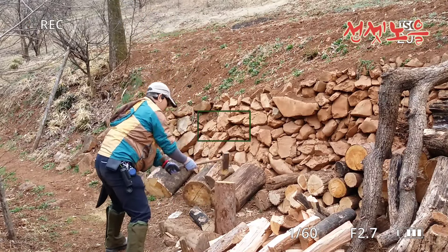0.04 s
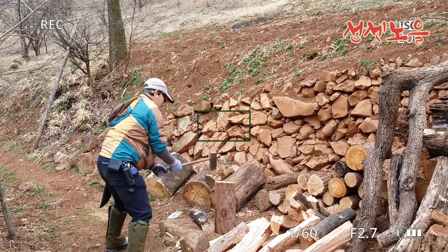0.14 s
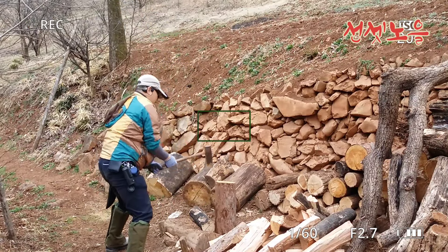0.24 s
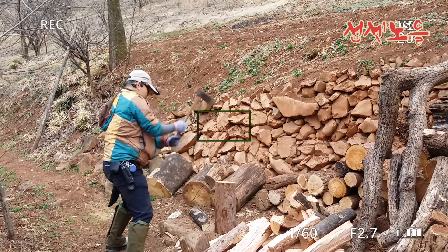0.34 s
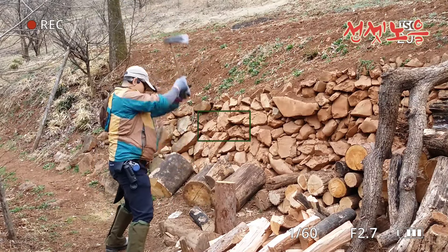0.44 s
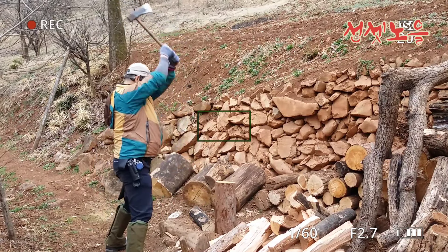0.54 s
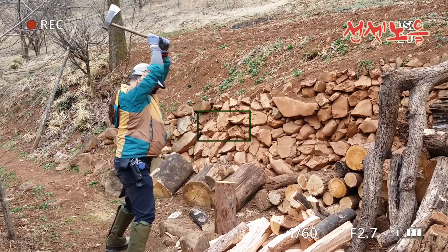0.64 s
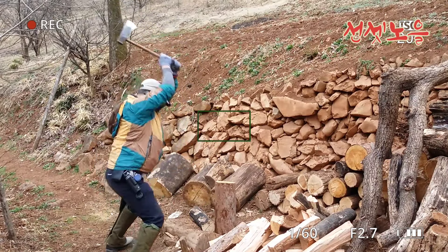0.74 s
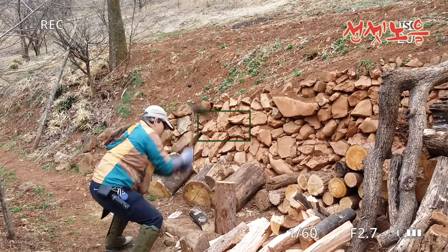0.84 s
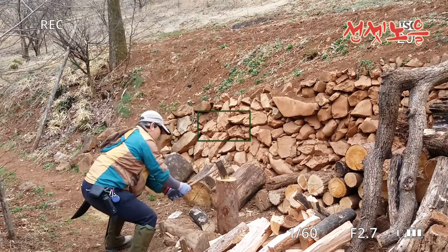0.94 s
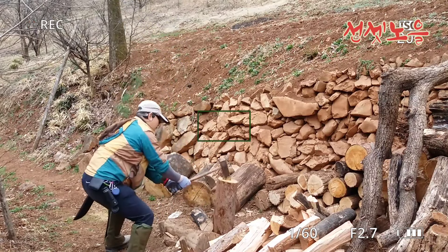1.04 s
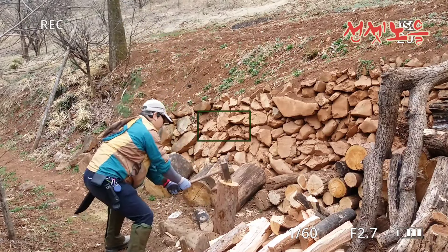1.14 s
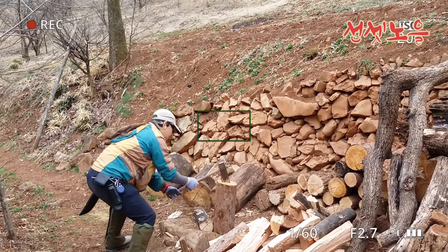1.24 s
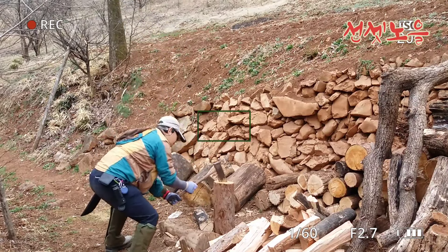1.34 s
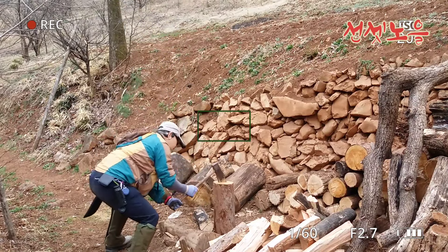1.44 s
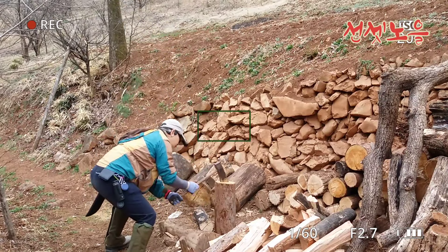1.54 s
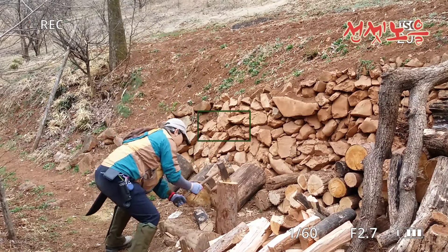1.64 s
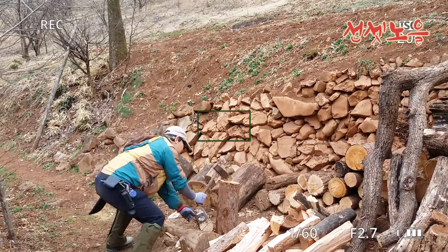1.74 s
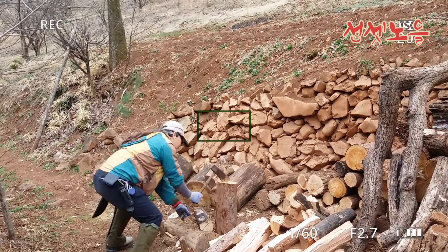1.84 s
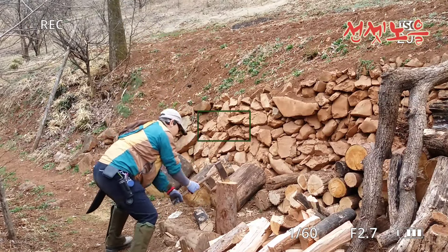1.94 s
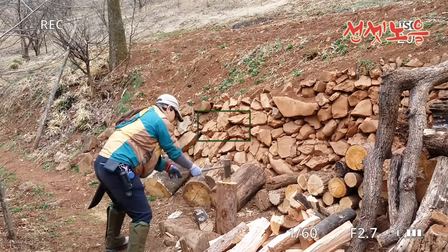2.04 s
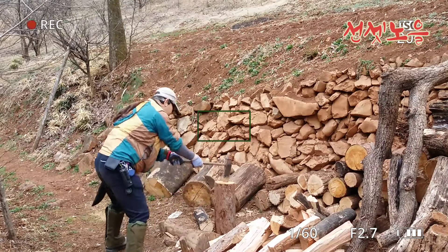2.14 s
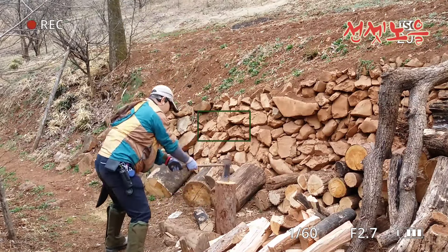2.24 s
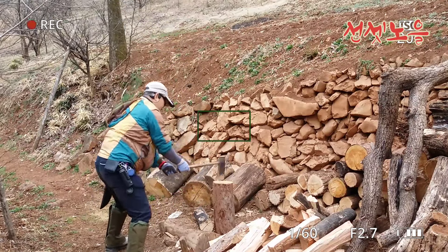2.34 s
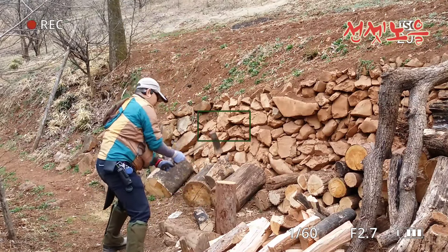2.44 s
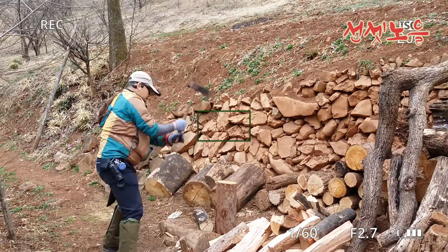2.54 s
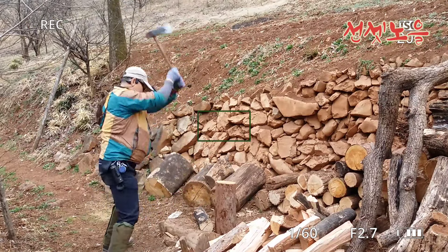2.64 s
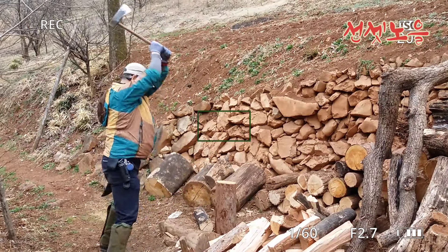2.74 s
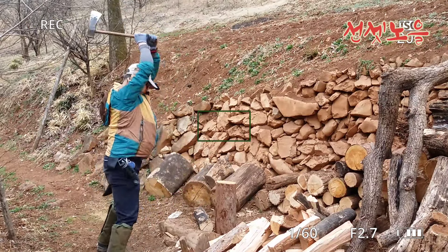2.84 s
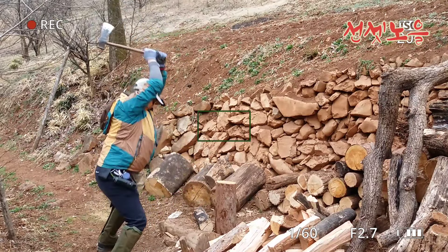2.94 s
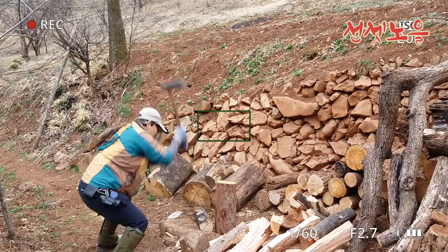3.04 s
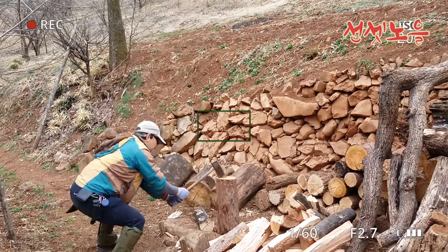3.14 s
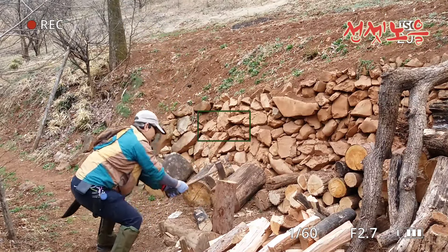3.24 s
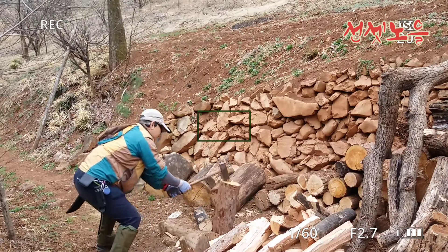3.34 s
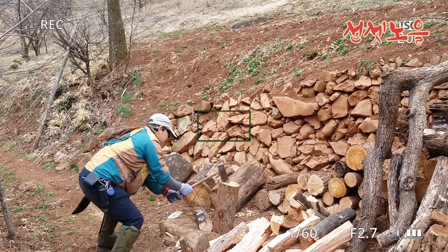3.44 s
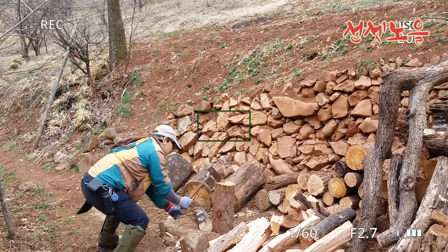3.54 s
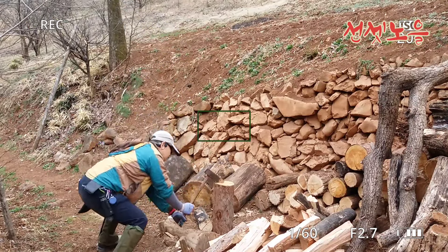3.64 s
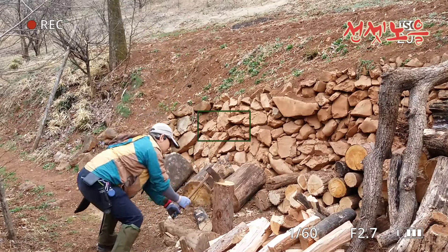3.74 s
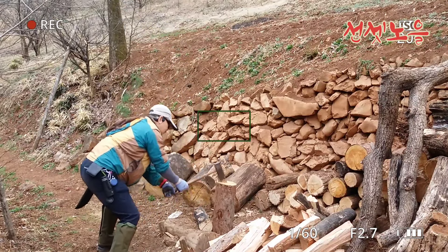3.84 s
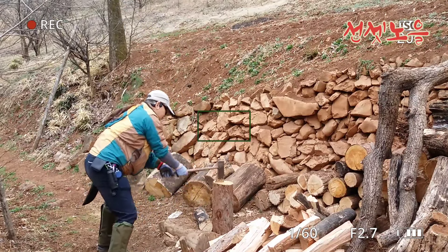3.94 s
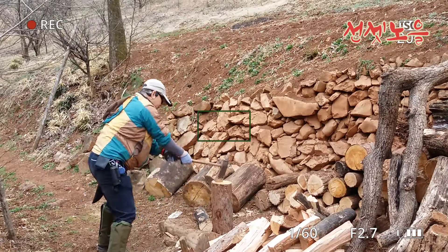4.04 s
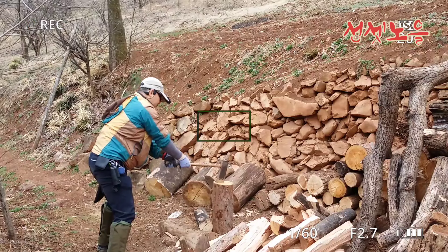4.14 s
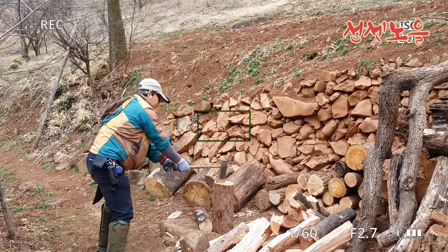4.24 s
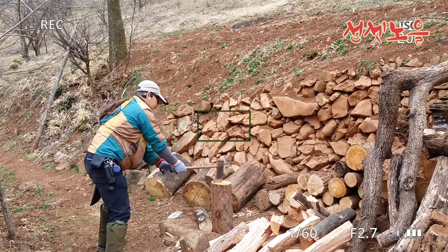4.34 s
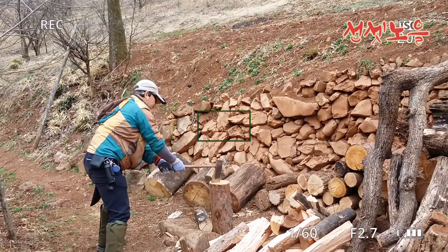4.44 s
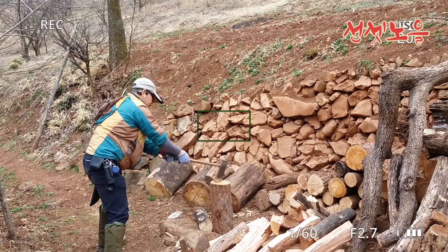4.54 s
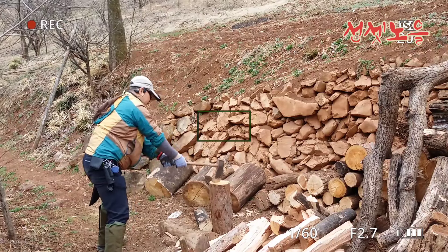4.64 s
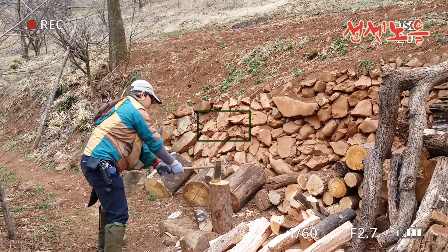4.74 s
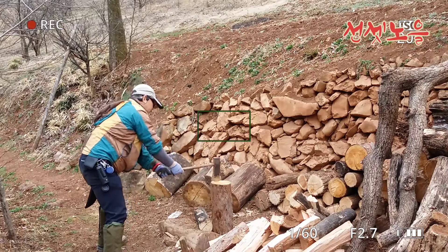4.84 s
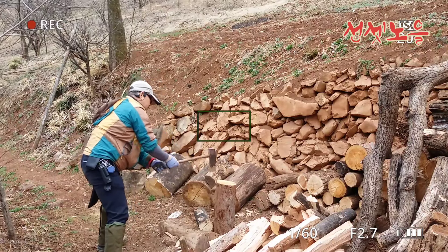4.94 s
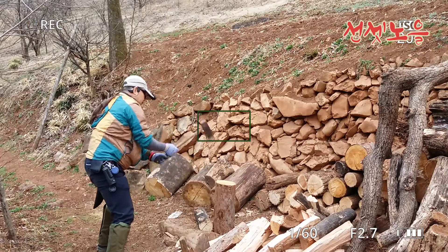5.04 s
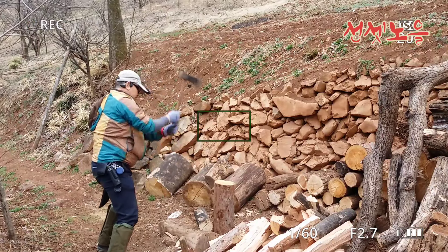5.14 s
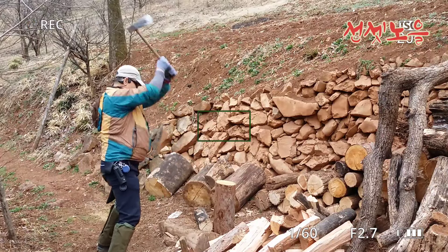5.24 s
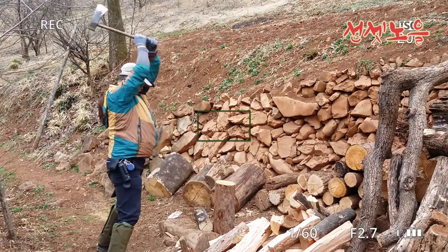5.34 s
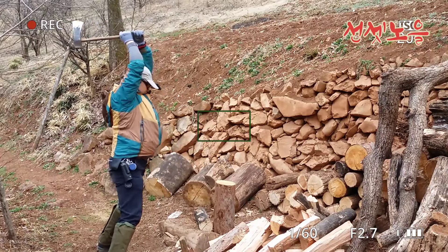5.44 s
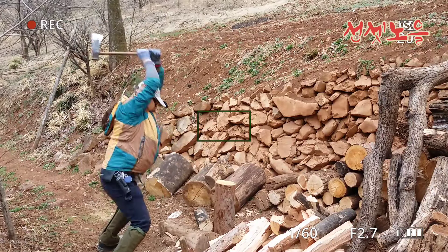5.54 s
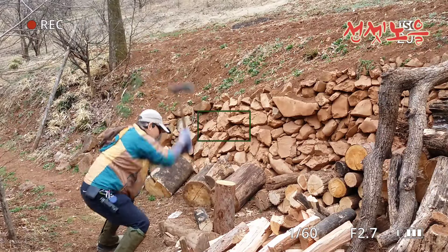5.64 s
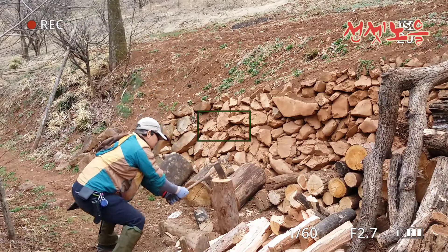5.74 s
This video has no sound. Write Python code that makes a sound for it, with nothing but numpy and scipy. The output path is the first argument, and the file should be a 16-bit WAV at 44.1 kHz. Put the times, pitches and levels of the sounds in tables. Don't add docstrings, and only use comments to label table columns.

```python
import sys
import numpy as np
from scipy import signal
from scipy.fft import rfft, irfft, next_fast_len
from scipy.io import wavfile
from scipy.ndimage import map_coordinates

SR = 44100
rng = np.random.default_rng(int(sys.argv[2]) if len(sys.argv) > 2 else 0)


def waveform_to_disk(signal):
    frames = np.transpose(np.atleast_2d(signal))
    scaled = np.clip(frames, -1, 1) * 32767
    samples = np.round(scaled).astype(np.int16)
    wavfile.write(sys.argv[1], SR, samples)


def decibels_to_gain(level_db):
    exponent = np.asarray(level_db, float) / 20
    return 10 ** exponent


N = 255780

# frequency in Hz, level in dB per Hz.
VALLEY = [(20, -0.5), (45, -3.5), (100, 0), (220, 1), (350, -3), (700, -14.5), (1500, -23.5), (4000, -48.5)]
# frequency in Hz, level in dB per Hz.
BUFFET = [(20, -9), (50, 1), (90, 1.5), (160, -5), (300, -22), (800, -61.5)]
# time in seconds, level in dB, left over right in dB.
GUSTS = [(0.0, -56.5, 5), (0.26, -70, 1.2), (0.335, -51, -16), (0.43, -54, 16), (0.51, -45, 15),
         (0.67, -58, -7), (0.89, -64, 5), (1.3, -74, -5), (1.76, -73, -1.3), (1.84, -64, -12),
         (2.1, -73, -1.2), (2.6, -78, -4), (2.93, -72, -1.5), (3.1, -77, 1.2), (3.57, -74, 3),
         (3.69, -63, -3), (4.42, -82, 0.35), (5.7, -70, -1.24)]
# time in seconds, peak in dB, pitch in Hz, left over right in dB.
PUFFS = [(0.331, -30.5, 83.4, -23), (0.383, -42, 40.4, 20), (0.436, -40, 92, 25), (0.455, -32, 88, 23.0),
         (0.476, -28.5, 80, 29), (0.495, -29, 40.4, 19), (0.516, -33, 94.2, 17), (0.575, -43, 96.9, 11),
         (0.596, -39, 61.4, 14), (0.68, -43.5, 78, 15), (0.724, -47, 72.7, 12), (1.48, -53, 87, -3),
         (1.835, -41, 68.1, -15.5), (2.69, -55, 111, -0.5)]
# frequency in Hz, time to fade by 60 dB in seconds.
SLOPE = [(100, 0.22), (500, 0.12), (1500, 0.07), (3000, 0.14), (8000, 0.22), (15000, 0.12)]
# frequency in Hz, change in dB.
SOAKED = [(500, 0), (1400, -5), (2600, 0)]

# time in seconds, effort in dB.
MOVES = [(0.0, -69.5), (0.12, -74), (0.4, -69.5), (0.8, -69.5), (1.3, -70.5), (1.57, -72.5), (1.808, -67.5),
         (1.946, -70), (2.514, -71), (2.76, -65.5), (3.05, -70), (3.45, -71), (3.73, -62), (3.89, -67.5),
         (4.02, -65), (4.3, -74), (5.2, -73), (5.6, -74.5)]
# time in seconds, half length in seconds, peak effort in dB.
SURGES = [
    (.25, .13, -65.5),
    (.53, .11, -59.5),
    (.705, .045, -60),
    (2.7, .04, -63.5),
    (5.42, .14, -65),
]
# start in seconds, fastest moment in seconds, its dB, dB at impact.
SWINGS = [
    (0.838, .88, -51.5, -54.5),
    (3.06, 3.18, -53, -53),
    (5.63, 5.72, -51.5, -58),
]
# frequency in Hz, level in dB per Hz.
FABRIC = [(1200, -26), (2500, -2.5), (5000, -3), (9000, -1.5), (15000, -5)]
# frequency in Hz, level in dB per Hz.
SWISH = [(200, -23), (500, 1), (1000, -0.5), (2000, -6), (3500, -15), (8000, -54.5)]

# time in seconds, pitch in Hz, level in dB.
CHIRP = [
    (3.832, 7620, -75.5),
    (3.845, 8200, -50.5),
    (3.86, 9660, -64),
    (3.876, 10800, -56),
    (3.884, 11700, -66),
    (3.888, 12900, -56),
    (3.9, 15040, -64.5),
    (3.906, 15740, -84),
]
# time in seconds, pitch in Hz, level in dB.
SQUEAK = [
    (4.803, 1990, -72),
    (4.811, 1920, -63),
    (4.815, 1890, -55),
    (4.822, 1790, -54),
    (4.826, 1715, -55),
    (4.832, 1720, -58),
    (4.837, 1790, -62),
    (4.843, 1860, -72),
    (4.85, 1800, -94),
]
# time in seconds, pitch in Hz, level in dB.
WHISTLE = [
    (5.72, 950, -72),
    (5.736, 1220, -52),
    (5.748, 1340, -56),
    (5.758, 1380, -80),
]

# start in seconds, length in seconds,
# level in dB, # share through the wood in dB, time to fade by 60 dB in seconds.
SCRAPES = [(0.997, .012, -32, -12, .06), (1.0712, .003, -50, -25, .01), (1.4315, 0.011, -57, -4, .02),
           (1.7387, .006, -56.5, -5.5, .015), (1.769, .01, -57.5, -12, 0.023),
           (1.786, 0.0063, -52, -13, .02), (1.799, .009, -51, -11, .02), (1.811, .016, -54, -10, 0.048),
           (3.1985, .001, -15, -6, .01), (3.22, .012, -32.5, -11, .05), (3.5605, 0.006, -60, -6, .03),
           (3.6535, .004, -43, -5, .065), (3.6798, 0.036, -47, -7, .05), (3.693, 0.0013, -34, -13, .01),
           (3.818, .03, -61, -15, .2), (4.083, 0.003, -26, -24, 0.032), (4.09, .015, -51, -24, .03),
           (4.1068, 0.004, -28, -20, 0.025), (4.101, .003, -55, -18, .02), (0.871, .012, -56, -30, .02),
           (4.21, .01, -69, -30, .03), (5.66, .015, -63, -30, .03), (1.776, .022, -61, -4, .02),
           (4.113, 0.0026, -46, -16, 0.07), (5.7936, .0015, -9, -12, .01)]
# frequency in Hz, width in Hz, level in dB.
WOOD = [(506, 250, -6), (840, 300, -1), (1300, 320, 1), (1840, 200, -3.5), (3150, 200, -5.5)]
# frequency in Hz, level in dB per Hz.
EDGE = [(800, -29.5), (2500, -6.5), (6000, -0.5), (9000, 2.5), (12000, -7.5), (15500, -10.5)]

# frequency in Hz, level in dB per Hz.
FIBRE = [(800, -32), (2500, -13), (4500, -9), (6500, 0), (9000, 2.5), (12000, -5), (15500, -10.5)]
# time in seconds, peak in dB.
SNAPS = [(1.425, -47), (1.4385, -39), (1.487, -38), (1.7632, -45), (1.7448, -40), (1.7712, -30),
         (1.7736, -31), (1.7885, -34), (1.7915, -37), (1.8019, -38), (1.8172, -33), (1.8228, -33),
         (1.7824, -29), (1.7864, -36.5), (1.8009, -34.5), (1.8046, -34.5), (1.8138, -28), (1.8205, -22),
         (1.9625, -35.5), (2.1096, -47.5), (2.2665, -30.5), (2.3921, -43), (3.2079, -7.5), (3.5465, -47),
         (3.6626, -33.5), (3.6674, -29.5), (3.7002, -13), (3.6915, -27), (3.6948, -15), (3.7092, -28),
         (3.6437, -44), (3.7604, -33), (3.794, -41)]
# time in seconds, peak in dB, wood tone in dB, wood tone in Hz.
TAPS = [(0.8794, -47, -14, 611), (1.4198, -47.5, -19, 1140), (1.435, -33.5, -19, 1880),
        (1.4364, -42.5, -8.5, 840), (1.4798, -49, -15, 657), (1.739, -39.5, -14, 750),
        (2.2088, -46, -15.5, 1650), (2.3592, -53.5, 0.5, 625), (2.4337, -58, -3, 1450),
        (2.6397, -59, 3.5, 670), (2.6894, -55.5, 0.4, 614), (2.7048, -45.5, -12.5, 1370),
        (3.0884, -45.5, -10.5, 1163), (3.2313, -13, -12, 1008), (3.5632, -46, 0, 853),
        (3.6508, -30, -23, 1864), (3.6802, -23, -14, 980), (3.6825, -30, 0.5, 950),
        (3.7053, -11.5, -17, 1380), (3.694, -13, -17, 1280), (3.7123, -29, -22, 1250),
        (3.7209, -23, -15.5, 1150), (3.7985, -33, -20, 830), (3.9828, -37, -20.5, 1940),
        (4.164, -49, -9, 1100), (4.2007, -47, -10, 902)]
# multiple of the wood tone, level in dB.
TAP_TONES = [(1, 3.5), (1.7, -2.5), (2.6, -6)]
# time in seconds, peak in dB, pitch in Hz, 60 dB fade in seconds.
CLICKS = [(3.6526, -13, 5500, .0015), (3.6526, -16, 9800, .0015), (3.6526, -24, 2800, .002),
          (3.649, -44, 3300, .005), (3.6805, -28, 10200, .003), (5.7913, -34, 2500, .004),
          (5.791, -40, 7200, .004), (1.004, -28, 4100, .012), (0.985, -20, 2250, .012),
          (3.2315, -24, 7000, .004), (4.804, -60, 2700, .012), (1.822, -34, 5800, .003),
          (1.0787, -36, 3200, .006), (3.655, -36, 3300, .006), (1.0787, -23, 7200, .004),
          (2.0715, -54, 11000, .003), (2.267, -40, 4800, .003), (1.8212, -30, 9500, .002),
          (1.8145, -36, 10500, .003), (3.5476, -46, 8000, .002), (3.5615, -49, 8500, .003),
          (3.5626, -45, 8500, .004), (3.5936, -52, 8000, .003), (3.537, -56, 7000, .003),
          (3.836, -54, 6200, .006), (3.8362, -56, 12500, .004), (3.908, -52, 10800, .004),
          (3.9082, -58, 7800, .004), (1.4875, -38, 5400, .003), (2.2092, -50, 8000, .002),
          (2.434, -54, 2600, .004), (3.706, -24, 7000, .003), (1.745, -44, 7500, .002),
          (3.9832, -44, 8500, .003), (4.0825, -26, 7000, .002)]

# time in seconds, tick in dB, knock in dB, hollow tone in Hz,
# contact in seconds.
REBOUNDS = [
    (1.0789, -23.5, -20.5, 290, 0.0024),
    (3.3057, -22.5, -18, 277, 0.003),
]
FAR_EDGE_DELAYS = [
    .0004,
    .002,
]
# multiple of the hollow tone, level in dB, share of its fade time.
LANDING = [(.8, -2, 1.04), (1.02, 5.5, 0.93), (1.7, -1.5, 0.89), (2.7, -1.5, 0.8), (3.5, -8.5, 0.65),
           (4.4, -18, 1), (5.4, -13, 0.91), (7, -24, 0.15)]
# frequency in Hz, level in dB per Hz.
CLACK = [(800, -16), (3000, -9), (5000, -4), (7500, 1.5), (10000, -7), (15500, -19)]

# time in seconds, pitch in Hz, level in dB, 60 dB fade in seconds.
THUDS = [(0.98, 84, -6.5, 0.052), (0.9809, 149, -8.5, 0.052), (1.012, 95, -27, .06), (1.036, 75, -36, .08),
         (1.125, 400, -52, .03), (1.15, 340, -52, .03), (1.159, 270, -47, .04), (1.168, 310, -50, .03),
         (0.9762, 1300, -6, .014), (0.9764, 1560, -7, .013), (0.998, 520, -27, .04),
         (1.002, 1300, -30, .03), (1.006, 1030, -31, .03), (1.103, 310, -33, 0.028),
         (1.0805, 430, -22, .018), (1.08, 1750, -28, .014), (1.081, 1150, -30, .02),
         (1.098, 1600, -56, .03), (3.33, 520, -44, .02), (3.307, 750, -23, .022), (3.3135, 720, -24, .018),
         (3.292, 750, -38, .018), (3.3065, 1150, -36, .02), (3.3065, 2350, -36, .02),
         (3.237, 950, -36, .03), (3.247, 760, -40, .03), (3.22, 850, -30, .03), (3.233, 420, -30, .04),
         (3.229, 4300, -28, .01), (1.803, 3040, -54.5, 0.065), (1.81, 2600, -48, .03),
         (1.8205, 3080, -33, 0.01), (2.688, 328, -51.5, 0.029), (3.204, 121.8, -10, 0.089),
         (3.2056, 66.97, -12, 0.066), (3.2024, 1550, 8, .011), (3.2032, 1260, 5, .012),
         (3.2016, 1780, 1.5, .012), (3.203, 297, -13, .06), (3.2012, 540, -.6, .016), (3.2, 3250, -3, .012),
         (5.7959, 1050, -1.5, .02), (5.7955, 560, -7, .02), (3.225, 1030, -24, 0.025),
         (3.229, 1600, -32, .015), (3.224, 330, -28, .03), (3.329, 333, -35.5, 0.03),
         (5.795, 138.8, -17.5, 0.073), (5.794, 65, -26, .06), (5.7945, 1550, -10, .014)]
# time in seconds, pitch in Hz,
# level in dB, 60 dB fade in seconds.
KNOCKS = [(3.69, 225, -48, 0.052), (4.083, 1300, -16.5, 0.013), (4.0819, 549, -28.5, 0.025),
          (4.083, 259, -37, 0.05), (4.1, 270, -46, .07), (4.107, 600, -44, .03), (4.108, 420, -49, .04),
          (4.084, 880, -33, .015), (4.083, 370, -38, .03), (4.0825, 1890, -26, .014),
          (4.0828, 3250, -27, .012), (4.0875, 570, -41, .03), (4.106, 1060, -44, .025),
          (4.119, 1320, -46, .03), (3.6875, 900, -38, .02), (3.795, 1640, -52, .02),
          (4.083, 122, -51, 0.081), (5.671, 1300, -48, .02), (5.69, 260, -48, .04), (5.722, 250, -45, .04),
          (5.66, 270, -50, .04), (3.5525, 1200, -54, .015), (5.724, 600, -50, .02),
          (5.673, 1050, -50, .015), (1.475, 230, -56, .04)]
# time in seconds, crack in dB, tearing time in seconds, log knock in Hz, knock in dB.
BLOWS = [
    (0.9755, -3, 0.0044, 639.6, -2.5),
    (3.1993, -2.2, 0.0073, 630, -4.5),
    (5.7948, -3.5, .008, 790.3, -1.5),
]
# pitch in Hz, level in dB, time to fade by 60 dB in seconds.
LOG = [(290, -27, 0.15), (428, -18, 0.037), (760, -8.5, 0.028), (920, -15, 0.032), (1030, -17, 0.041),
       (1300, -9.5, .014), (1573, -7.5, 0.011), (1850, -13, .018), (2900, -14, 0.011)]
# frequency in Hz, level in dB per Hz.
CRACK = [(100, -19.5), (600, 1.5), (2100, -8), (4200, -8.5), (6000, -5), (10000, -9.5), (13000, -17),
         (16000, -26.5)]
# frequency in Hz, change in dB.
DULLED = [(300, -1), (900, -2), (1600, -4), (2800, 2.5), (4500, 1.5), (7000, -2.5), (12500, -4),
          (16000, -14)]

# frequency in Hz, left over right in dB.
SHADE = [(300, -1), (1500, 2), (3000, 1), (7000, -2.5), (9500, -3), (13000, 1)]
# frequency in Hz, width in Hz, level in dB.
PORTS = [
    (7010, 900, 11.5),
    (8570, 1600, -3),
]


def unit(x):
    return x / np.sqrt(np.mean(x ** 2) + 1e-20)


def curves(rows, outside=None):
    s, *cols = np.transpose(rows)
    return [np.interp(np.arange(N) / SR, s, c, outside, outside) for c in cols]


def wobble(rate):
    points = rng.standard_normal(int(N * rate / SR) + 4)
    return map_coordinates(points, [np.arange(N) * rate / SR])


def filtered(x, response):
    m = next_fast_len(x.shape[-1] + 8192)
    return irfft(rfft(x, m) * response(np.fft.rfftfreq(m, 1 / SR)), m)[..., :x.shape[-1]]


def along(points, hz):
    f, v = np.transpose(points)
    return np.interp(np.log(hz + 1), np.log(f), v)


def noise(spectrum, size=N, alike=0., mono_hz=1):
    def mix(hz):
        share = 1 - (1 - np.clip(alike, 0, 1)) / (1 + (mono_hz / (hz + 1)) ** 2)
        return decibels_to_gain(along(spectrum, hz)) * np.sqrt([share, 1 - share, 1 - share])

    common, *own = filtered(rng.standard_normal((3, size)), mix)
    return unit(common + np.array(own))


def peak(f, hz, width_hz, db):
    return decibels_to_gain(db) * 1j * f * width_hz / (hz * hz - f * f + 1j * f * width_hz)


def wooden(x):
    return filtered(x, lambda f: sum((-1) ** k * peak(f, *mode) for k, mode in enumerate(WOOD)))


def ring(t, hz, db, t60, attack):
    return decibels_to_gain(db - 60 * t / t60) * (1 - np.exp(-t / attack)) * np.sin(2 * np.pi * hz * t)


def add(track, s, sound):
    spot = track[..., round(s * SR):][..., :sound.shape[-1]]
    spot += sound[..., :spot.shape[-1]]


def sides(pan_db):
    left = 1 / (1 + decibels_to_gain(-np.asarray(pan_db)))
    return 2 * np.array([left, 1 - left])


def outdoors():
    buffet_db, lean_db = curves(GUSTS)
    lumps = decibels_to_gain(2.8 * np.array([wobble(25), wobble(27)]))
    wind = decibels_to_gain(buffet_db - 3.5) * sides(lean_db) * unit(lumps) * noise(BUFFET, alike=0.04)
    t = np.arange(SR // 10) / SR
    for s, db, hz, pan_db in PUFFS:
        add(wind, s - .004, sides([pan_db]) * ring(t, hz, db + 4.5, t60=0.027, attack=0.0028))
    valley = decibels_to_gain(-69.5 + 0.66 * wobble(6.2)) * noise(VALLEY, alike=.72)
    hiss = decibels_to_gain(-75) * noise([(500, -5), (1500, 6), (9000, 0), (15000, 2.0)])
    return wind + valley + hiss


def hillside(x):
    hz, _, z = signal.stft(rng.standard_normal((2, SR // 3)), SR, nperseg=128)
    t = np.arange(z.shape[-1]) * 64 / SR
    fade = decibels_to_gain(-60 * t / along(SLOPE, hz)[:, None])
    tail = signal.istft(z * fade, SR, nperseg=128)[1]
    late = np.pad(x, ((0, 0), (150, 0)))
    return signal.fftconvolve(late, tail / np.linalg.norm(tail[0]), axes=1)[:, :N]


def clothing():
    rest_db, jerk_db, jerk_s, settle_s = -71, -60.5, .025, .24
    effort_db, t = curves(MOVES)[0], np.arange(N) / SR
    for (start, fastest, fastest_db, impact_db), (blow, *_) in zip(SWINGS, BLOWS):
        times = [start, start + jerk_s, fastest, blow, blow + settle_s]
        levels = [rest_db, jerk_db, fastest_db, impact_db, rest_db]
        effort_db = np.maximum(effort_db, np.interp(t, times, levels, -99, -99))
    for s, half, db in SURGES:
        effort_db = np.maximum(effort_db, db - 6 * ((t - s) / half) ** 2)
    wind_db = curves(GUSTS)[0]
    swish_db = rest_db - 7 + 1.06 * (effort_db - rest_db) + .15 * (wind_db - rest_db)
    grit = unit(decibels_to_gain(1.5 * wobble(400) + 1.2 * wobble(25)))
    rustle = decibels_to_gain(effort_db - 0.5) * grit * noise(FABRIC, alike=0.1)
    return rustle + decibels_to_gain(swish_db + 2.1 * wobble(27)) * noise(SWISH, alike=0.27)


def glide(rows, overtones_db, rough, flutter_db):
    hz, db = curves(rows)[0], curves(rows, outside=-150)[1]
    turn = 2 * np.pi * np.cumsum(hz * (1 + rough * wobble(480))) / SR
    tones = sum(decibels_to_gain(o) * np.sin((k + 1) * turn) for k, o in enumerate(overtones_db))
    return decibels_to_gain(db + flutter_db * wobble(150)) * tones


def squeaks():
    glove = glide(SQUEAK, overtones_db=[-8, -12, -8, -7, -1, -10, -16], rough=.013, flutter_db=3)
    rub = decibels_to_gain(curves(SQUEAK, outside=-150)[1] - 3) * noise(FABRIC, alike=0.29)
    chirp = glide(CHIRP, overtones_db=[-4], rough=.01, flutter_db=3.5)
    whistle = glide(WHISTLE, overtones_db=[0], rough=.015, flutter_db=2.5)
    return chirp + glove + rub + whistle


def scrapes():
    bright, dull, t = np.zeros(N), np.zeros(N), np.arange(SR // 5) / SR
    for s, length, db, wood_db, t60 in SCRAPES:
        stroke = decibels_to_gain(db - 60 * np.maximum(t - length, 0) / t60) * (1 - np.exp(-t / 0.00053))
        add(bright, s, stroke)
        add(dull, s, decibels_to_gain(wood_db) * stroke)
    grit = unit(decibels_to_gain(2.2 * wobble(1200)))
    rubbing = rng.standard_normal(N) + 0.9 * rng.standard_normal((2, N))
    return grit * (bright * noise(EDGE, alike=.4) + dull * unit(wooden(rubbing)))


def ticks():
    out, t = np.zeros((2, N)), np.arange(SR // 20) / SR
    slips = [(*tap, EDGE, .006) for tap in TAPS]
    slips += [(*snap, -27, 900, FIBRE, .0045) for snap in SNAPS]
    for s, db, wood_db, wood_hz, colour, t60 in slips:
        fade = (decibels_to_gain(-60 * t / t60) + decibels_to_gain(-21 - 60 * t / .04)) * (1 - np.exp(-t / .0002))
        burst = fade * noise(colour, size=len(t), alike=0.4)
        snap = decibels_to_gain(db - 8) * burst / np.abs(burst.mean(axis=0)).max()
        wood = sum(ring(t, k * wood_hz, db + wood_db + more_db, t60=0.011, attack=0.0005)
                   for k, more_db in TAP_TONES)
        add(out, s + .0006, snap + wood)
    return out


def clicks():
    out, t = np.zeros((2, N)), np.arange(SR // 20) / SR
    for s, db, hz, t60 in CLICKS:
        add(out, s, ring(t, hz, db, t60, attack=.0001))
    return out


def rebounds():
    out, t = np.zeros((2, N)), np.arange(SR // 8) / SR
    hollow_t60 = .029
    for (s, tick_db, knock_db, hz, contact), late in zip(REBOUNDS, FAR_EDGE_DELAYS):
        fade = decibels_to_gain(-60 * t / 0.007) + decibels_to_gain(-19 - 60 * t / .05)
        clack = noise(CLACK, size=len(t), alike=.4, mono_hz=1500)
        tick = decibels_to_gain(tick_db) * fade * (1 - np.exp(-t / 0.00047)) * clack
        tones = sum(ring(t, hz * k, knock_db + db, hollow_t60 * share, contact) for k, db, share in LANDING)
        bark_fade = decibels_to_gain(knock_db - 14 - 60 * t / (0.92 * hollow_t60)) * (1 - np.exp(-t / contact))
        bark = bark_fade * noise(SWISH, size=len(t), alike=1.0)
        add(out, s, tick + bark)
        add(out, s + late, tones)
    return out


def thuds():
    out, t = np.zeros((2, N)), np.arange(SR // 3) / SR
    for s, hz, db, t60 in THUDS + KNOCKS:
        add(out, s, -ring(t, hz, db, t60, attack=.002))
    return out


def blows():
    out, t = np.zeros((2, N)), np.arange(SR // 3) / SR
    for s, crack_db, tear, knock_hz, knock_db in BLOWS:
        bite = 1 - np.exp(-t / .0007)
        after = np.maximum(t - tear, 0)
        effort = bite * decibels_to_gain(-60 * after / 0.023)
        deep_effort = bite * decibels_to_gain(-60 * after / .012)
        fading = bite * (decibels_to_gain(-15.5 - 60 * t / .135) + decibels_to_gain(-41 - 60 * t / 0.4))
        splinters = 1 + .5 * np.sin(np.cumsum(rng.normal(0, 0.068, len(t))))
        tearing = noise(CRACK, size=len(t), alike=.3, mono_hz=1600)
        deep = filtered(tearing, lambda f: 1 / (1 + (f / 2200) ** 4))
        settling = 0.9 * splinters * fading * filtered(tearing, lambda f: decibels_to_gain(along(DULLED, f)))
        crack = effort * (tearing - deep) + deep_effort * deep + settling
        knock = ring(t, knock_hz, knock_db + 6, t60=.016, attack=.0011)
        strengths_db = rng.normal(0, 2.5, len(LOG))
        body = sum(ring(t, hz, knock_db + db + more, t60, attack=0.0019)
                   for (hz, db, t60), more in zip(LOG, strengths_db))
        add(out, s, decibels_to_gain(crack_db - 3.5) * splinters * crack + knock + body)
    return out


def scene():
    work = squeaks() + scrapes() + ticks() + clicks() + rebounds() + thuds() + blows()

    def path(f):
        shade_db = along(SHADE, f) / 2
        return decibels_to_gain([shade_db, -shade_db]) * f / (f - 22j)

    direct = filtered(work, path)
    echo = decibels_to_gain(-24.5) * hillside(filtered(work, lambda f: decibels_to_gain(along(SOAKED, f))))
    return outdoors() + echo + clothing() + direct


def top_cut(x):
    return signal.sosfilt(signal.butter(12, 15450, fs=SR, output="sos"), x)


def record(dry):
    heard = filtered(dry, lambda f: np.array([1 + peak(f, *port) for port in PORTS]) * f / (f - 40j))
    clipped = heard / (1 + np.abs(heard) ** 8) ** (1 / 8)
    mix = clipped - .0007
    return top_cut(mix)


dry = scene()
out = record(dry)
waveform_to_disk(out)
```